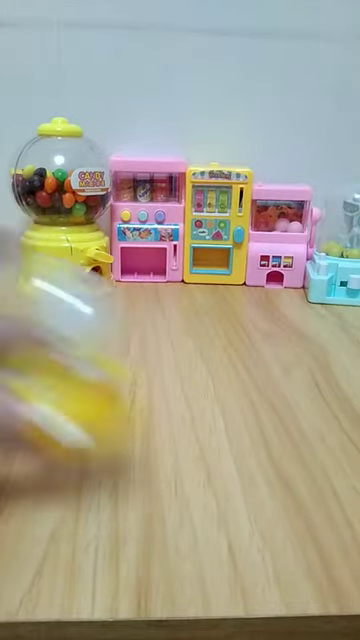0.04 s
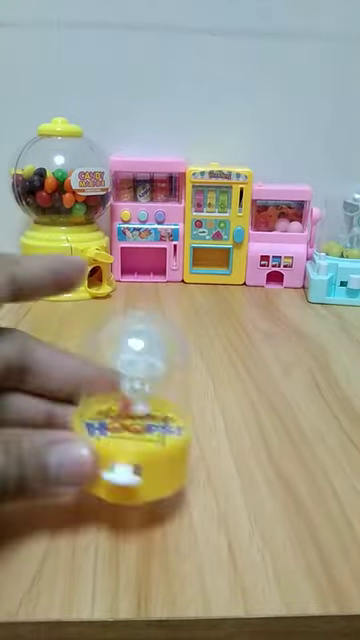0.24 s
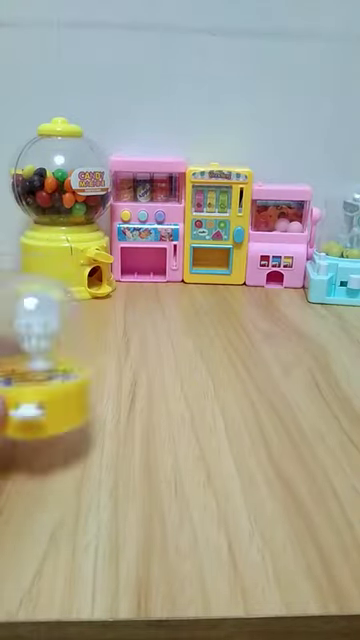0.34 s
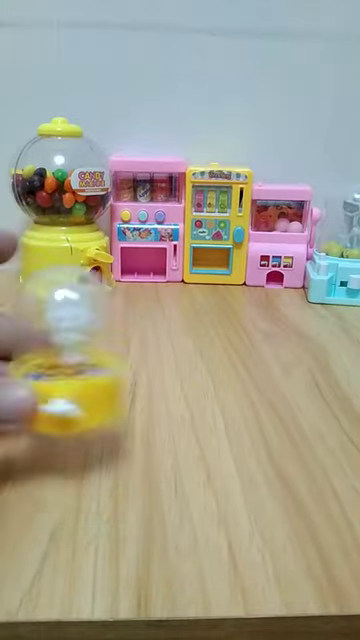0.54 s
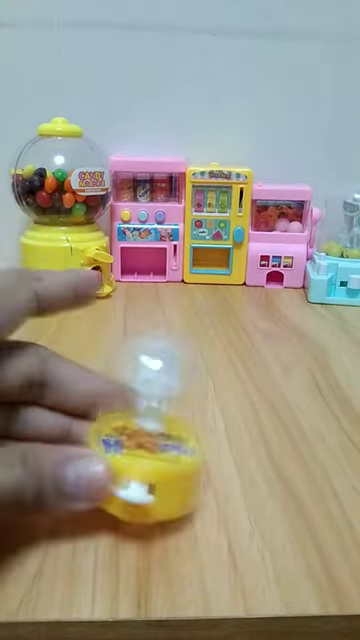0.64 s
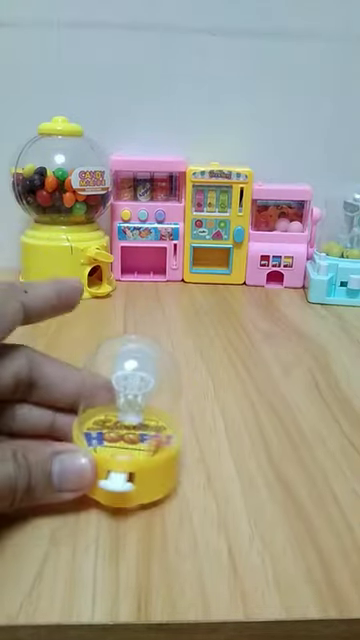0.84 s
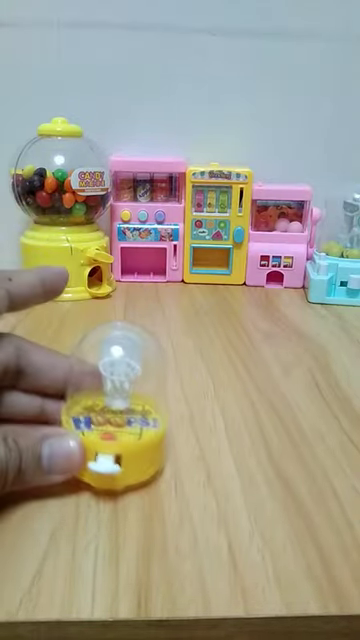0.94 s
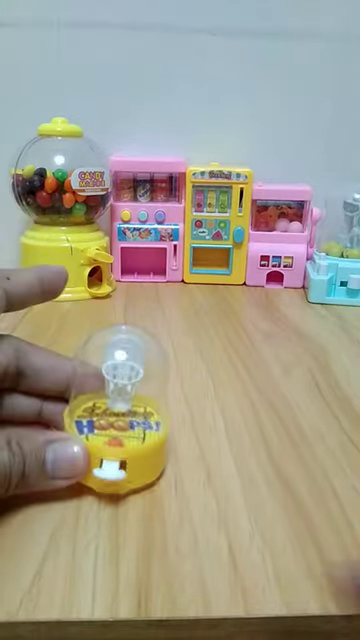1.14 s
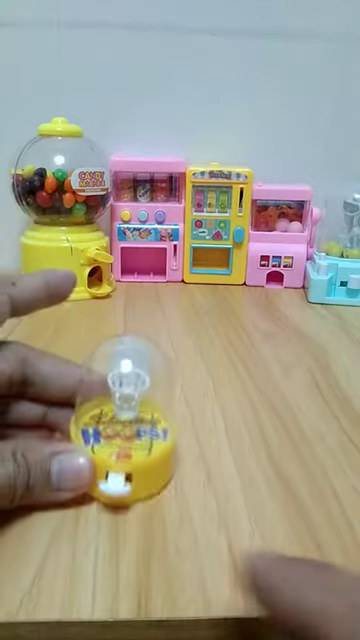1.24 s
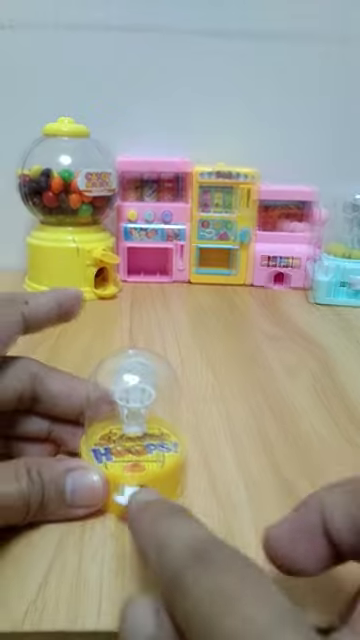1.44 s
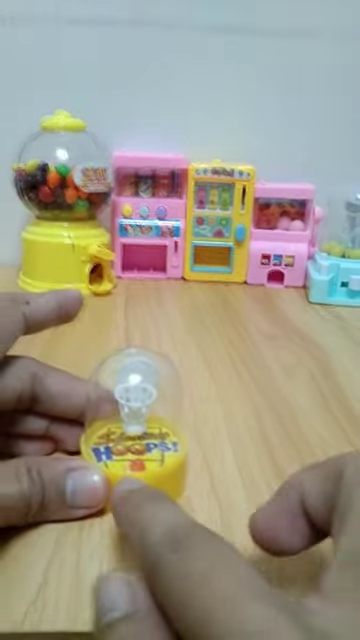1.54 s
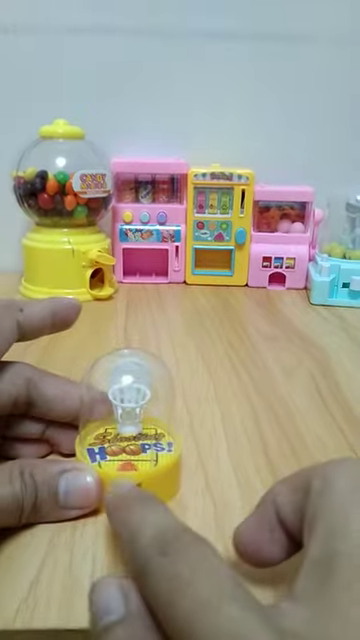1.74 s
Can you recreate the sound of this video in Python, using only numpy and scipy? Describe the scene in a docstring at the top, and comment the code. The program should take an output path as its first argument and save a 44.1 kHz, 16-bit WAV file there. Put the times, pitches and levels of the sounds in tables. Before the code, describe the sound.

A small plastic toy is shaken, the ball inside clacking sharply against its dome. It is set down on a wooden table with a hollow knock, then fingers softly nudge it. A fan hums faintly in the hard-walled room.

```python
"""A small plastic dome toy is shaken by hand just above a wooden table, in a hard-walled room.
The ball inside clacks from wall to wall and trundles on the hollow base between hits.
At 0.94 s the toy is set down: the casing knocks, the table thuds, the ball settles.
From about 1.4 s fingers nudge it and rub its lever. A fan hums throughout."""
import sys
import numpy as np
from scipy import signal
from scipy.fft import rfft, irfft
from scipy.io import wavfile

SR = 44100
rng = np.random.default_rng(int(sys.argv[2]) if len(sys.argv) > 2 else 0)


def unload_wav(signal):
    """Save mono or channel-first audio to the path in sys.argv[1] as 16-bit WAV at rate SR, clipped to [-1, 1]."""
    wavfile.write(
        sys.argv[1],
        SR,
        np.round(np.clip(np.atleast_2d(signal).T, -1, 1) * 32767).astype(np.int16),
    )


N = 79380
LEAD = round(0.1 * SR)  # samples mixed ahead of time zero
T = np.arange(SR // 8) / SR  # time axis of one hit
# contact tick spectrum: freq_hz, level_db
TICK_SPECTRUM = [(600, -14.5), (1800, 1.5), (3000, 2), (5200, 3), (8800, -5.5), (10200, -26), (15000, -19)]
TICK_T60_S = 0.017


def clacks(mix, treble_hz=6200, band_hz=(3320, 12200)):
    """Ball strikes the dome; the spot sets the mode balance. The far side feeds the room."""
    # ball hits: start_s, level_db, wall (0 low-ringing side, 1 bright side), treble_db, room_db
    hits = [(-.075, -12, 0.81, -0.5, -7.5), (.2316, -10.5, 0.53, -7, -1), (.3002, -5, 0.012, -4.5, -6.5),
            (.4805, -8, 0.83, -0.5, -4), (.5518, -3.5, 0.082, -7, -6.5), (.6848, -9, 0.58, 6.5, -4),
            (.7600, -7, 0.6, -3.5, -1.5), (.8641, -16, .75, -19.5, -6), (.9220, -17, 0.56, -10, 6),
            (.9277, -26, 0.39, 1, 3.5), (1.0100, -13.5, 0.55, -8, -4)]
    # dome modes: freq_hz, low_side_db, bright_side_db, t60_s
    dome_modes = [(3670, -28.5, -29.5, .01), (3797, -26, 1, 0.0086), (4044, -19, -15, 0.021),
                  (4276, -1, -28, 0.012), (4780, -20.5, -25.5, 0.017), (5230, -26, -26, 0.0097),
                  (6800, -28.5, -15.5, 0.015), (7550, -23, -3, .008), (8060, -23.5, -4, 0.014),
                  (8350, -16, -10, 0.022), (9000, -18.5, -12.5, 0.013), (9000, -45, -24.5, 0.0063),
                  (11850, -11.5, -25.5, 0.0062)]
    # contact noise spectrum: freq_hz, level_db
    crack_spectrum = [(2000, -9), (4000, 7), (6500, 6), (9000, 0.5), (11000, -12), (15000, 1.5)]
    for start_s, level_db, wall, treble_db, room_db in hits:
        modes = [(hz, low_db + wall * (bright_db - low_db) + treble_db * (hz > treble_hz), t60_s)
                 for hz, low_db, bright_db, t60_s in dome_modes]
        crack = amp(-10 + treble_db / 2) * burst(crack_spectrum, t60_s=0.011)
        front = radiated(ring(modes, detune=0.01) + crack, band_hz)
        back = radiated(ring(modes, detune=0.01, opposed=True) + crack, band_hz)
        add(mix, start_s, amp(level_db) * in_room(front, room_db, send=back))


def trundle(mix, band_hz=(575, 2100), bumps_per_s=50):
    """Rolling ball, later a fingertip, taps the hollow base; a faint patter runs under the roll."""
    # taps: start_s, level_db, tick_rel_db
    taps = [(.096, -51, -28), (.112, -42, -7.5), (0.149, -52.5, 8.5), (.154, -39.5, -17),
            (.184, -39.5, -13), (.195, -42.5, -9), (0.209, -40, 0.5), (.310, -41, 6.5), (0.3975, -38.5, -2),
            (0.418, -43.5, 8.5), (0.447, -35, -2.5), (0.461, -41.5, -18), (0.528, -40, -4),
            (0.5725, -40.5, 12), (0.659, -38.5, -14), (0.715, -48.5, 9), (.787, -37, 6.5),
            (.835, -40.5, -14), (0.846, -44.5, -15.5), (1.376, -53, 6.5), (1.4591, -34, -9)]
    # base modes: freq_hz, level_db, t60_s
    base_modes = [(720, -1, 0.014), (928, -3, 0.021), (1123, -12.5, 0.005), (1796, -11.5, 0.045)]
    base = np.zeros(len(mix))
    for start_s, level_db, tick_db in taps:
        body = radiated(ring(base_modes, detune=0.04), band_hz)
        tick = amp(tick_db) * burst(TICK_SPECTRUM, TICK_T60_S)
        add(base, start_s, amp(level_db) * (body + tick))
    t = (np.arange(len(mix)) - LEAD) / SR
    rolling = (t > 0.11) & (t < 0.88)
    bumps = rng.standard_normal(len(t)) * (rng.random(len(t)) < bumps_per_s / SR) * rolling
    patter = signal.fftconvolve(bumps, radiated(ring(base_modes), band_hz))[:len(t)]
    mix += in_room(base + amp(-53) * patter, room_db=-4.5)[:len(t)]


def knocks(mix):
    """Casing meets wood or fingers: short hollow ring plus a sharp tick."""
    # casing contacts: start_s, level_db, tick_rel_db, room_db
    contacts = [(.9403, -9.5, -17.5, -3.5), (.9517, -20.5, 0.5, -8), (.9835, -39, 10.5, -17),
                (1.067, -71, 10.5, 24), (1.1113, -26.5, -9.5, 2), (1.4775, -32.5, -13, -1.5),
                (1.642, -46.5, 4, 2.5)]
    # casing modes: freq_hz, level_db, t60_s
    casing_modes = [(399, -12.5, 0.075), (761, -14.5, 0.015), (1010, -15, 0.012), (1880, -13, 0.014),
                    (2054, -7, 0.0079), (2498, -10, 0.016), (3900, -29.5, 0.02), (6140, -10, 0.0033)]
    for start_s, level_db, tick_db, room_db in contacts:
        body = radiated(ring(casing_modes, detune=0.018), band_hz=(623, 7800))
        tick = amp(tick_db) * burst(TICK_SPECTRUM, TICK_T60_S)
        add(mix, start_s, in_room(amp(level_db) * (body + tick), room_db))


def thuds(mix, boom_hz=176.7, boom_t60_s=0.066, rise_s=0.0068):
    """The hand's weight rings the low modes of the table top."""
    # soft pushes: start_s, level_db, boom_rel_db
    pushes = [(.9435, -35, -8), (1.1415, -27, -15), (1.466, -39.5, -7), (1.587, -28, -4),
              (1.696, -38, -0.5)]
    # table top modes: freq_hz, level_db, t60_s
    wood_modes = [(266, -2.5, 0.03), (315, -1.5, 0.065), (407, -17.5, 0.031), (506, -7.5, 0.033),
                  (734, -8.5, 0.018)]
    rise = np.minimum(T / rise_s, 1)
    for start_s, level_db, boom_db in pushes:
        modes = wood_modes + [(boom_hz, boom_db, boom_t60_s)]
        body = radiated(ring(modes, detune=0.042), band_hz=(86, 1900))
        add(mix, start_s, in_room(amp(level_db) * body * rise, room_db=-1.5))


def rubs(mix):
    """Skin slides on plastic: a swell of friction noise with a thin squeak."""
    # finger strokes: start_s, length_s, level_db, squeak_rel_db
    strokes = [(1.47, 0.23, -57, -32), (1.605, 0.037, -49.5, -6), (1.73, 0.088, -69.5, 11.5)]
    # friction spectrum: freq_hz, level_db
    friction_spectrum = [(300, 3.5), (900, -6), (2000, -9.5), (3200, -13), (6000, -13.5), (8500, -9),
                         (11000, -43), (15000, -41)]
    # squeak resonances: centre_hz, width_hz, level_db
    squeak_peaks = [(3690, 290, -10), (4750, 300, -3), (5780, 880, -8)]
    hz = np.fft.rfftfreq(SR, 1 / SR)
    peaks = sum(amp(db) / (1 + (2 * (hz - centre_hz) / width_hz) ** 2)
                for centre_hz, width_hz, db in squeak_peaks)
    for start_s, length_s, level_db, squeak_db in strokes:
        friction = noise(friction_spectrum, SR)
        squeak = amp(squeak_db) * unit(irfft(rfft(rng.standard_normal(SR)) * peaks))
        swell = signal.windows.tukey(round(length_s * SR), 0.7)
        add(mix, start_s, amp(level_db) * swell * (friction + squeak)[:len(swell)])


def fan(rotation_hz=23.83):
    """Adjacent rotation harmonics beat into a low flutter, over moving air."""
    # hum partials: harmonic, level_db
    partials = [(3, -68.5), (4, -50.5), (5, -49), (6, -50.5), (7, -67.5), (15, -74)]
    # hum waver: time_s, gain_db
    waver = [(0, -0.5), (.22, 1.5), (.5, -2.5), (1.0, -4.5), (1.4, -4), (1.8, -7.5)]
    # airflow spectrum: freq_hz, level_db
    air_spectrum = [(25, -1), (60, 0.5), (120, 14.5), (220, 3), (350, 2.5), (550, -10.5), (950, -6.5),
                    (1300, -21), (3500, -17), (6000, -47), (9000, -41.5), (15000, -64.5)]
    t = np.arange(N) / SR
    hum = sum(np.sqrt(2) * amp(db) * np.cos(2 * np.pi * k * rotation_hz * t) for k, db in partials)
    return hum * amp(np.interp(t, *np.transpose(waver))) + amp(-57.5) * noise(air_spectrum, N)


def in_room(x, room_db, send=None, onset_s=0.0092, early_t60_s=0.081, late_t60_s=0.95, late_top_hz=4800):
    """x plus echoes of send (default x): nearby objects, walls, a faint dull linger."""
    # wall echo decay: freq_hz, t60_s
    wall_t60 = [(150, 0.083), (700, 0.16), (2000, .3), (4200, 0.3), (8500, 0.3), (14000, 0.28)]
    # echo spectrum: freq_hz, gain_db
    colour = [(150, 0), (1000, 2.5), (2500, -1), (4000, -3), (6000, 0), (8500, 1), (14000, 2)]
    size = SR * 3 // 4
    echoes = rng.choice([-1., 1.], size) * (rng.random(size) < 0.2)
    hz, frame_s, bands = signal.stft(echoes, SR, nperseg=128)
    hz = hz[:, None]
    walls = amp(-60 * frame_s / read(wall_t60, hz))
    late = amp(-13 - 60 * frame_s / late_t60_s) / (1 + (hz / late_top_hz) ** 4)
    tail = signal.istft(bands * amp(read(colour, hz)) * (walls + late), SR, nperseg=128)[1][:size]
    t = np.arange(size) / SR
    early = amp(6.5 - 60 * t / early_t60_s)
    tail *= (1 + early) * np.minimum(t / onset_s, 1) ** 2
    out = signal.fftconvolve(x if send is None else send, amp(room_db) * tail / np.linalg.norm(tail))
    out[:len(x)] += x
    return out


def ring(modes, detune=0., opposed=False, scatter_db=1):
    """Decaying sines, varied per hit; opposed flips every second mode."""
    jitter = rng.uniform(-1, 1, (len(modes), 2))
    parts = [amp(db + scatter_db * dg - 60 * T / t60_s) * np.sin(2 * np.pi * hz * (1 + detune * df) * T)
             for (hz, db, t60_s), (df, dg) in zip(modes, jitter)]
    return sum(-part if opposed and k % 2 else part for k, part in enumerate(parts))


def burst(spectrum, t60_s, rise_s=0.0004):
    """Brief noise of a hard contact."""
    return noise(spectrum, len(T)) * amp(-60 * T / t60_s) * np.minimum(T / rise_s, 1)


def radiated(x, band_hz):
    """A part radiates little outside its band."""
    return signal.sosfilt(signal.butter(3, band_hz, "bandpass", fs=SR, output="sos"), x)


def noise(spectrum, size):
    """Shaped noise, unit rms."""
    hz = np.fft.rfftfreq(size, 1 / SR)
    return unit(irfft(amp(read(spectrum, hz)) * np.exp(2j * np.pi * rng.random(len(hz))), size))


def read(points, hz):
    """Interpolate over log frequency."""
    point_hz, value = np.transpose(points)
    return np.interp(np.log(hz + 1), np.log(point_hz), value)


def amp(db):
    """dB to gain."""
    return 10 ** (np.asarray(db) / 20)


def unit(x):
    """Scale to unit rms."""
    return x / np.sqrt(np.mean(x ** 2) + 1e-20)


def add(mix, start_s, sound):
    """Mix in at start_s; time zero is sample LEAD."""
    part = mix[max(round(start_s * SR) + LEAD, 0):][:len(sound)]
    part += sound[:len(part)]


def scene():
    """Toy handling over the fan, mono."""
    mix = np.zeros(LEAD + N)
    for source in (trundle, clacks, knocks, thuds, rubs):
        source(mix)
    return (mix[LEAD:] + fan())[None]


def record(dry, cutoff_hz=15900):
    """Steep low-pass."""
    lowpass = signal.firwin(255, cutoff_hz, window=("kaiser", 9), fs=SR)
    return signal.oaconvolve(dry, lowpass[None], "same")


dry = scene()
out = record(dry)
unload_wav(out)
```